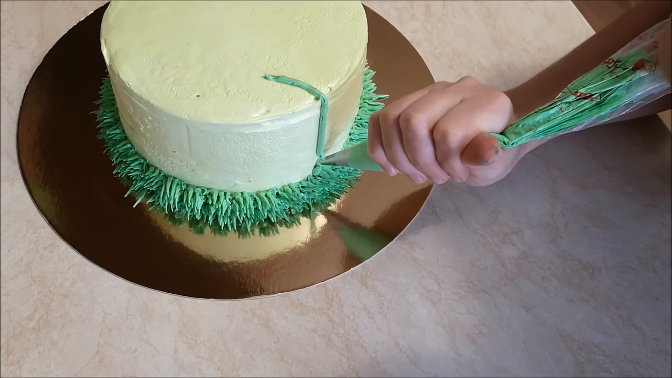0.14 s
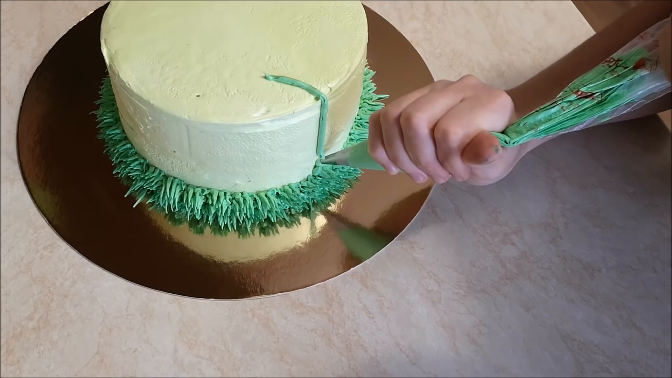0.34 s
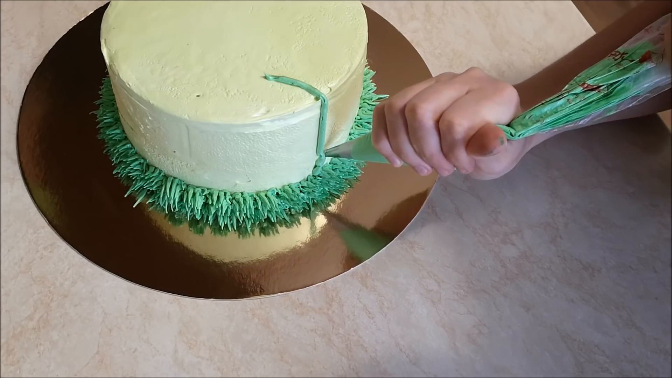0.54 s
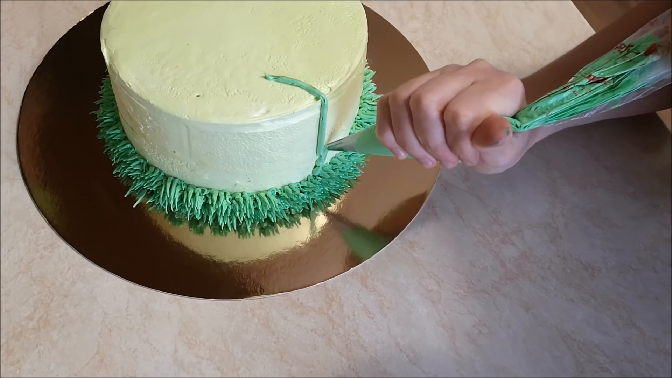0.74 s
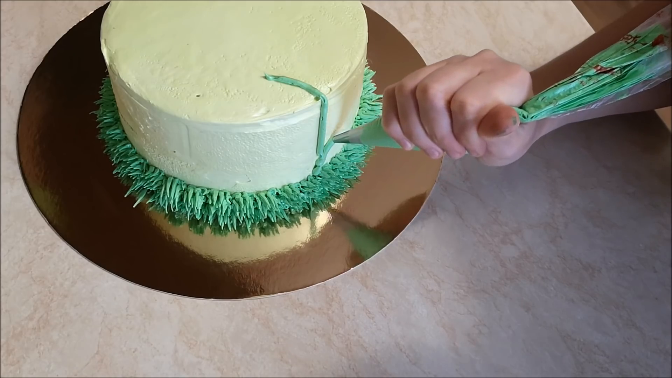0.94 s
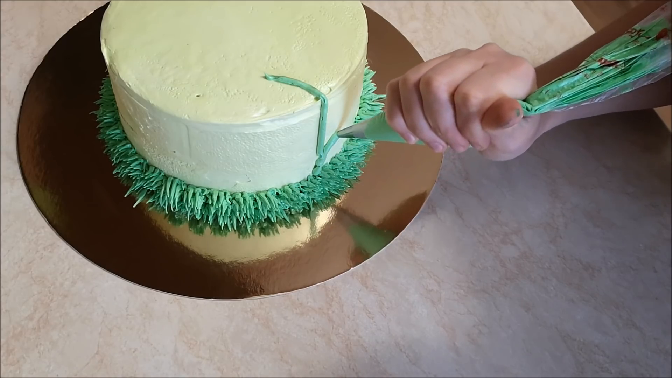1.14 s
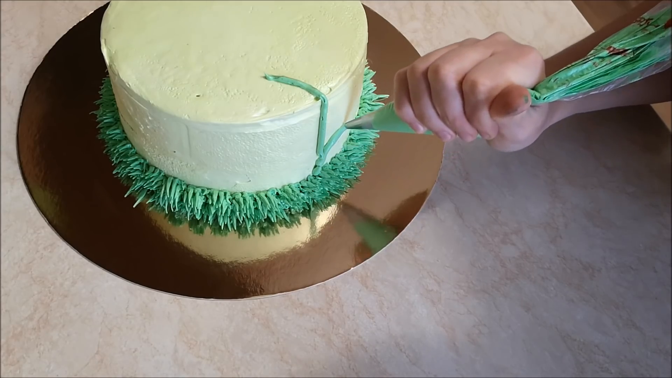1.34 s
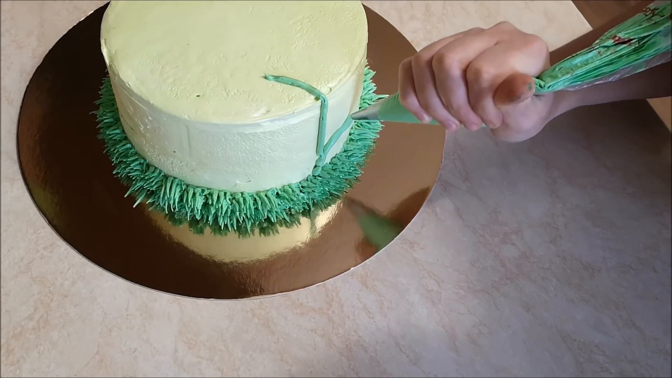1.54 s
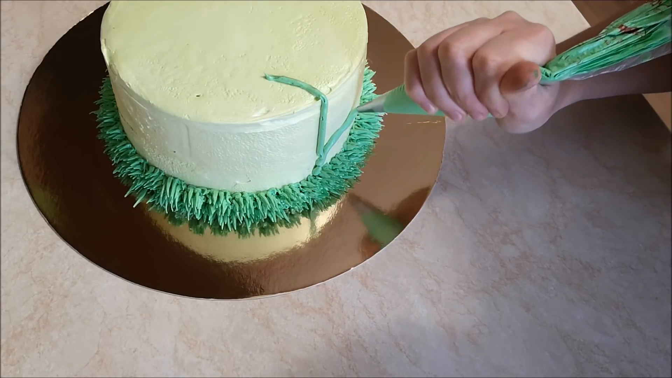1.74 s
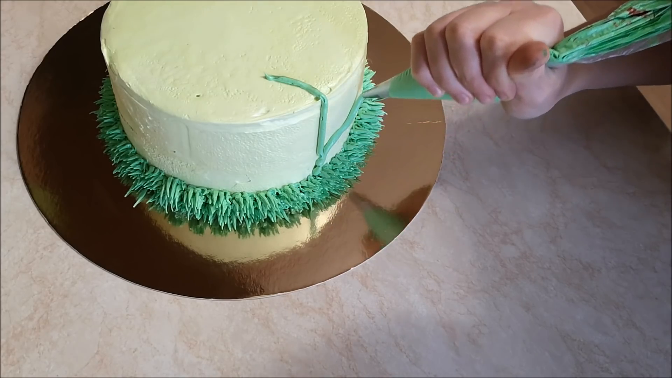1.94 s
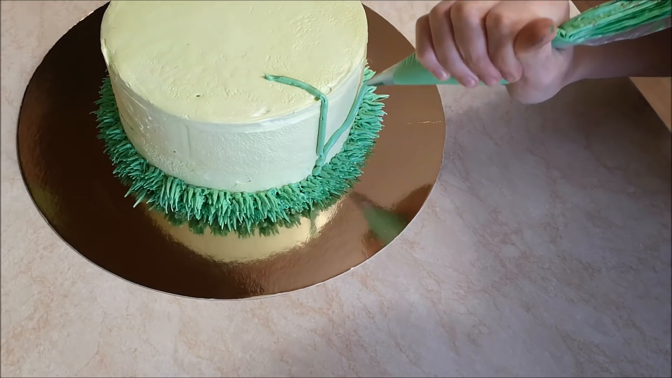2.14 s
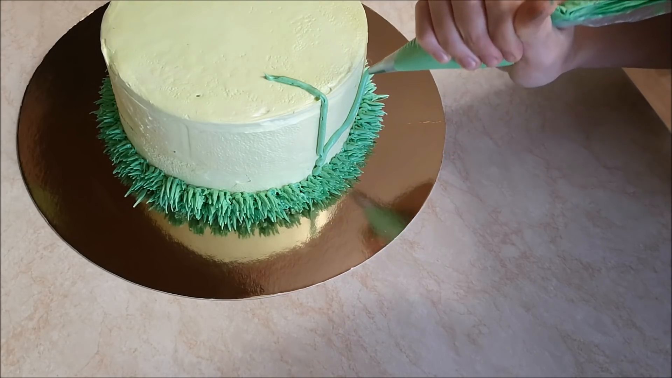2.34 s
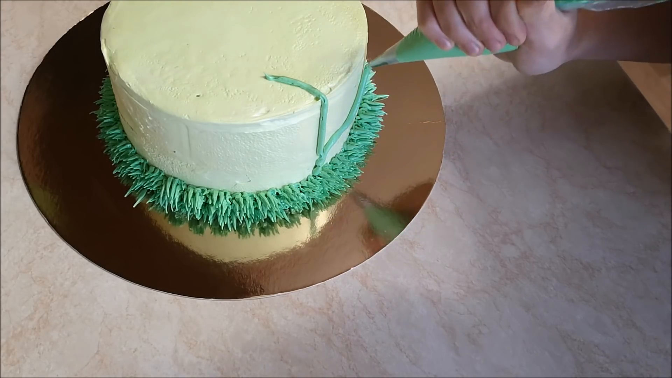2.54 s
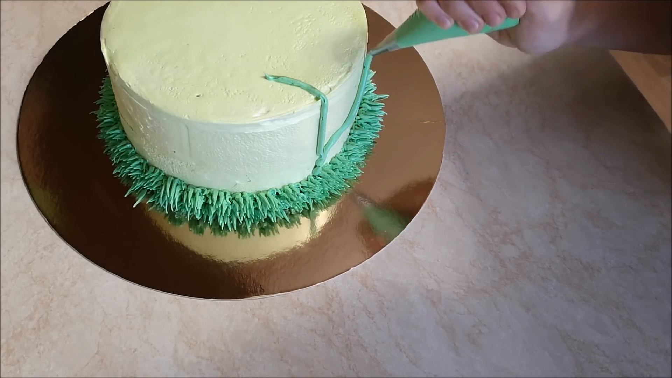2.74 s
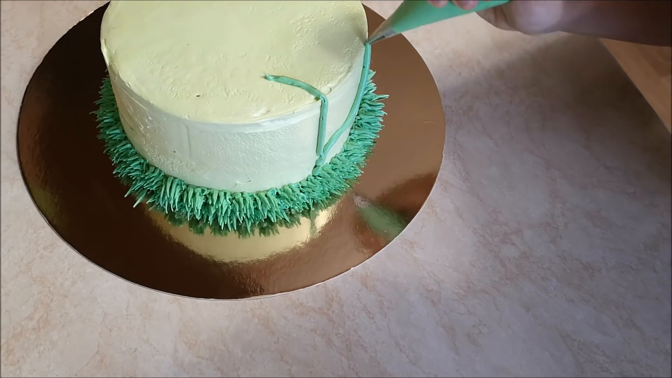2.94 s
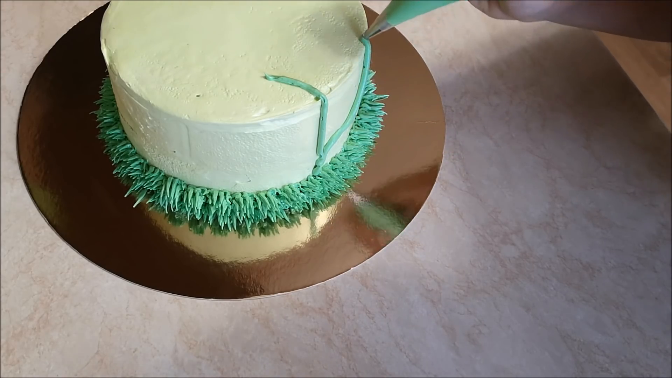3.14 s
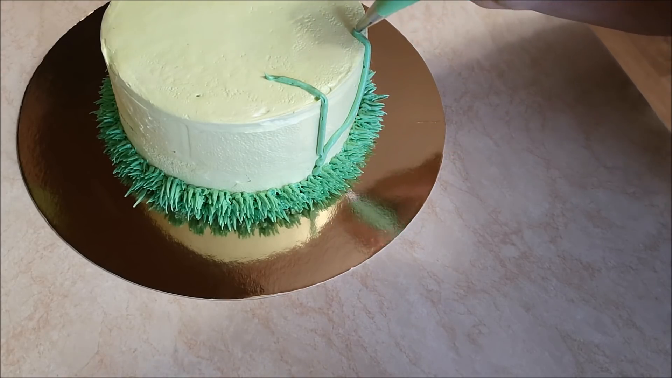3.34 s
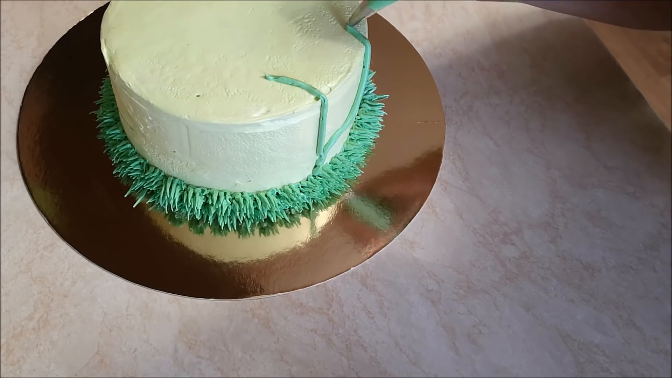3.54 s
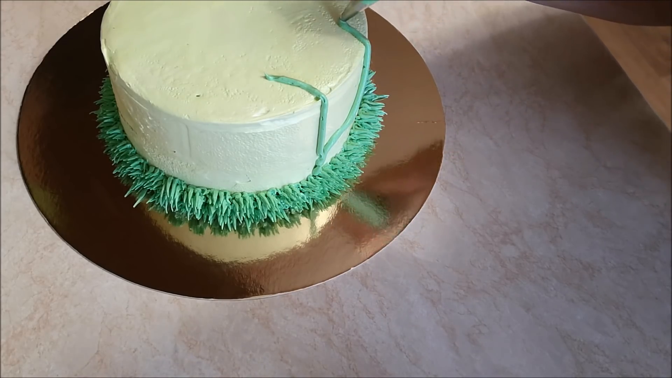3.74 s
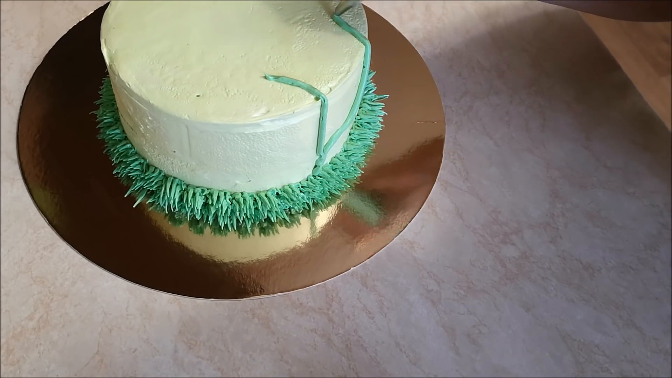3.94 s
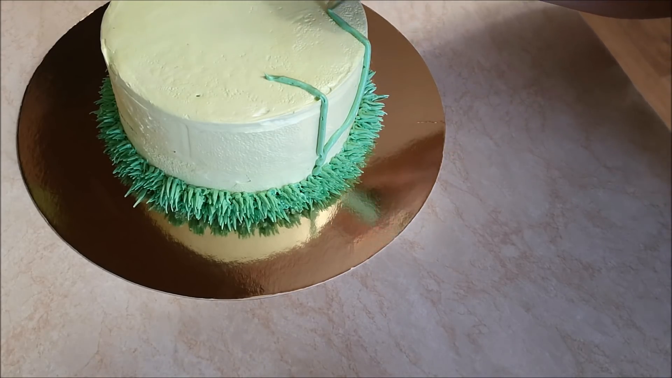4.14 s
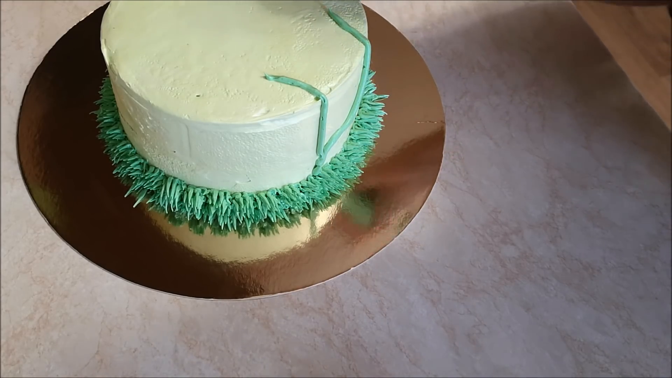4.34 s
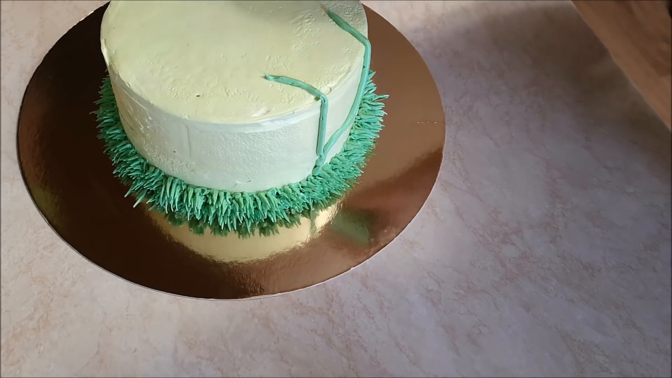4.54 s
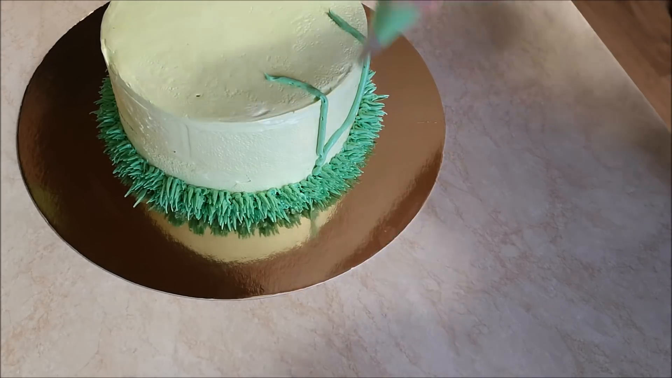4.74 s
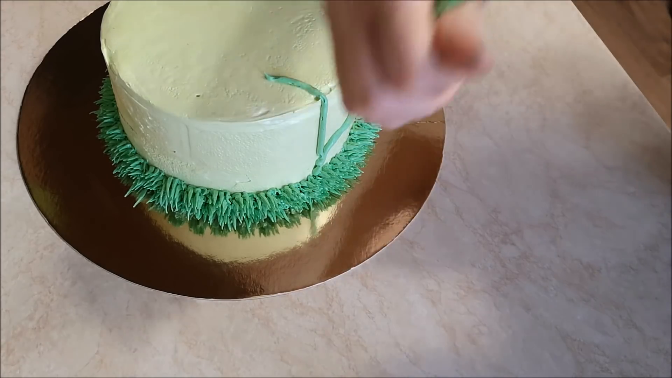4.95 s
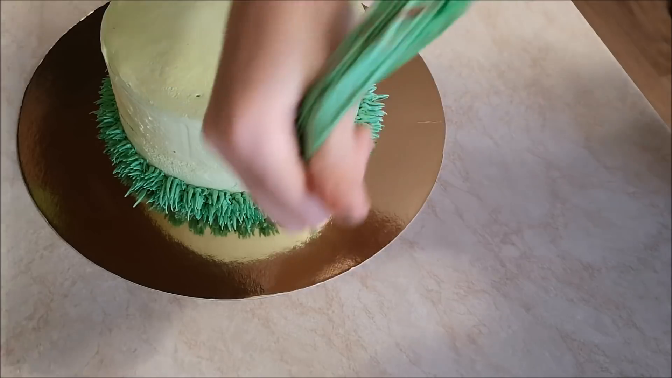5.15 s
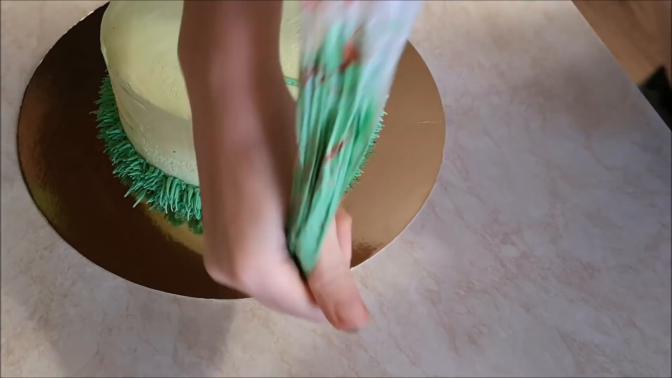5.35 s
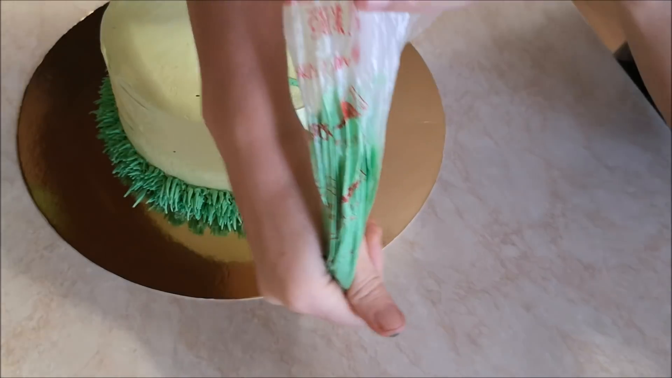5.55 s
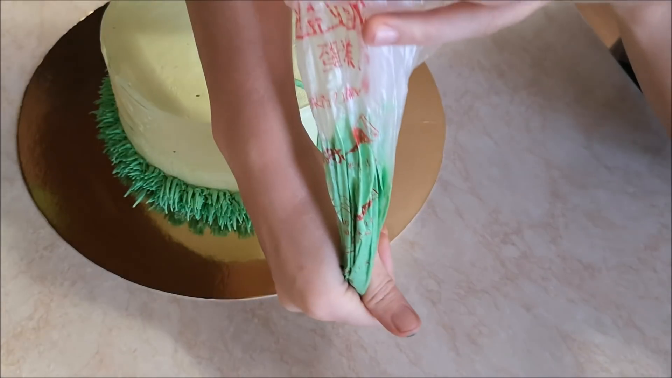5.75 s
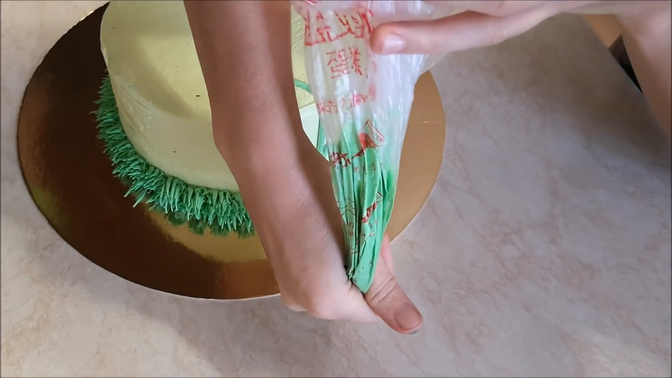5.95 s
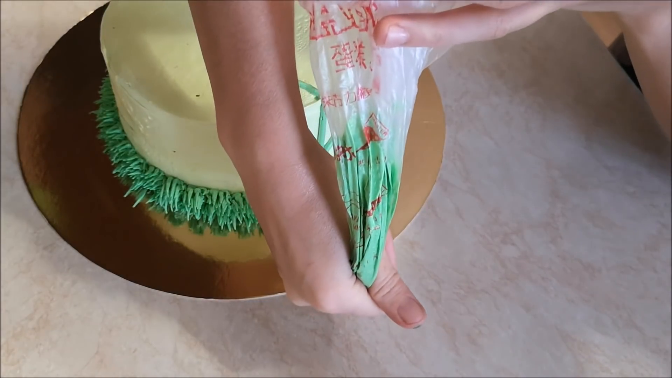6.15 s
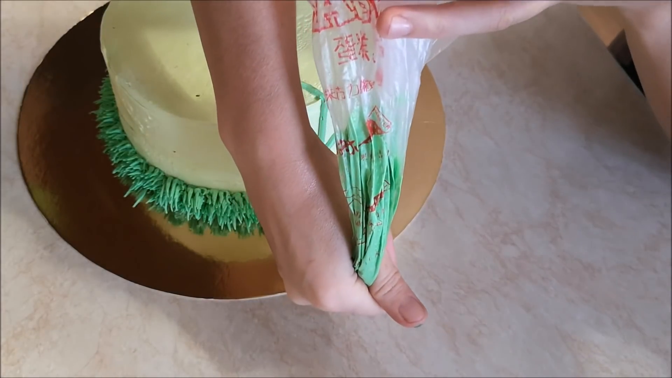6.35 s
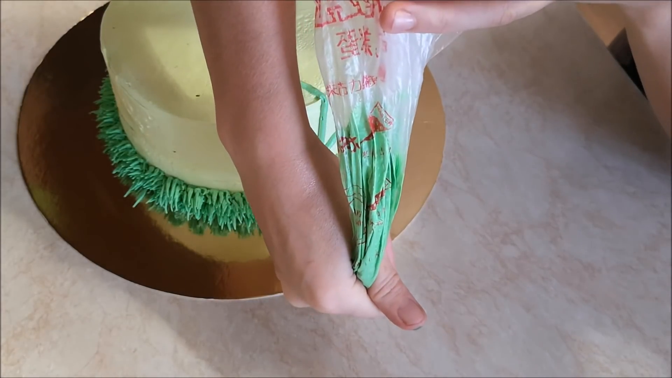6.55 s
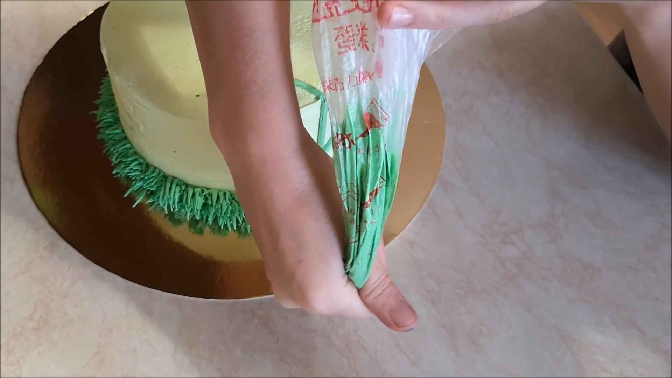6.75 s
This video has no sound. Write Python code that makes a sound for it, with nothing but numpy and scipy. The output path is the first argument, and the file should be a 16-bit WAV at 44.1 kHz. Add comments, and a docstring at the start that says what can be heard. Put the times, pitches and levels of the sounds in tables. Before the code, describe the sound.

A thin plastic piping bag is squeezed, giving scattered light ticks and faint whispers of sliding film. Past the middle it is lifted and crumpled, and the snaps crowd into a crisp, dense rustle, with a dull rumble of moving arms and a soft push of air. It settles back to a few ticks. The microphones are close, in a quiet kitchen where a refrigerator hums faintly.

```python
"""A thin plastic piping bag is squeezed, then lifted and crumpled close to a pair of microphones.
Its creases snap one by one, each a burst of noise ringing a facet of film, then crowd into a dense
rustle; the film whispers as it slides and relaxes. A quiet kitchen answers with a short tail.
Moving arms add a dull rumble and a soft push of air. Behind, a refrigerator hums and whirrs
over room air and hiss."""
import sys
import numpy as np
from scipy import signal
from scipy.fft import rfft, irfft, next_fast_len
from scipy.io import wavfile

SR = 44100
rng = np.random.default_rng(int(sys.argv[2]) if len(sys.argv) > 2 else 0)


def wav_record(signal):
    """Record a signal, one row per channel, as 16-bit PCM in the file named by sys.argv[1]."""
    frames = np.transpose(np.atleast_2d(signal))
    bounded = np.clip(frames, -1, 1)
    # unit amplitude maps onto the largest positive 16-bit level
    quanta = np.round(bounded * 32767).astype(np.int16)
    wavfile.write(sys.argv[1], SR, quanta)


N = 299259
TIME = np.arange(N) / SR


def from_db(db):
    """Decibels to gain."""
    return np.exp(np.asarray(db) * np.log(10) / 20)


def unit_rms(x):
    """Scale to an rms of 1."""
    return x / np.sqrt(np.mean(x ** 2) + 1e-20)


def automation(rows):
    """Breakpoints, time first, to one curve per remaining column."""
    times, *columns = np.transpose(rows)
    return [np.interp(TIME, times, column) for column in columns]


def at_hz(points, hz):
    """Read a curve on a log-frequency axis."""
    freqs, values = np.transpose(points)
    return np.interp(np.log(hz), np.log(freqs), values)


def drift(rate_hz):
    """Slow random modulation with a spread of 1."""
    hop, run_in = 40, 2000
    r = np.exp(-2 * np.pi * rate_hz * hop / SR)
    slow = signal.lfilter([1], [1, -2 * r, r * r], rng.standard_normal(N // hop + run_in + 2))[run_in:]
    return np.interp(np.arange(N) / hop, np.arange(len(slow)), unit_rms(slow))


def butter(x, hz, kind="low", order=2):
    """Butterworth filter."""
    return signal.sosfilt(signal.butter(order, hz, kind, fs=SR, output="sos"), x)


def resonate(x, hz, width_hz):
    """Two-pole resonance, unity gain at its peak."""
    r = np.exp(-np.pi * width_hz / SR)
    poles = [1, -2 * r * np.cos(2 * np.pi * hz / SR), r * r]
    return signal.lfilter(np.array([1, 0, -1]) * (1 - r * r) / 2, poles, x)


def ring(x, hz, width_hz):
    """Two passes through a resonance, at unit rms."""
    return unit_rms(resonate(resonate(x, hz, width_hz), hz, width_hz))


def eq(x, curve):
    """Shape the spectrum with an EQ curve."""
    size = next_fast_len(x.shape[-1], real=True)
    hz = np.maximum(np.fft.rfftfreq(size, 1 / SR), 1)
    return irfft(rfft(x, size) * from_db(at_hz(curve, hz)), size)[..., :x.shape[-1]]


def tilt(x, tilt_db, pivot_hz=4500):
    """Tip the treble against the lows; at 0 dB a mild bump stays at the pivot."""
    return from_db(-tilt_db / 2) * butter(x, pivot_hz) - from_db(tilt_db / 2) * butter(x, pivot_hz, "high")


def pan(left_db):
    """Stereo gains that favour the left by left_db."""
    return from_db([[left_db / 2], [-left_db / 2]])


def stereo(mid, side, correlation):
    """Mix two noises into left and right with a given correlation."""
    correlation = np.clip(correlation, -.999, .999)
    mid, side = np.sqrt(1 + correlation) * mid, np.sqrt(1 - correlation) * side
    return np.array([mid + side, mid - side])


def stereo_noise(correlation):
    """White noise in two channels."""
    return stereo(*rng.standard_normal((2, N)), correlation)


def noise_bands(noise, bands, waver_db):
    """Narrow bands of noise, each slowly swelling and sinking."""
    return sum(from_db(level_db + waver_db * drift(1.6)) * ring(noise, hz, width_hz)
               for hz, width_hz, level_db in bands)


# Tone of the room air and microphone hiss: f/Hz, level/dB
AIR_EQ = [(11, -56), (20, -16), (45, -20.5), (72, -24), (88, -7), (125, -9), (190, -10.5), (225, -18.5),
          (330, -15), (520, -26.5), (700, -27.5), (1600, -31.5), (3900, -36.5), (9000, -44), (16000, -47)]
# Stereo image of the air: f/Hz, left-right correlation
AIR_IMAGE = [(60, 0.99), (130, 1), (290, 0.56), (640, -0.61), (1400, 0.092), (15000, -0.24)]


def room_air(level_db=-64.5):
    """A steady bed of air and hiss, centred in the bass and wide above it."""
    size = next_fast_len(N, real=True)
    hz = np.maximum(np.fft.rfftfreq(size, 1 / SR), 1)
    mid, side = rfft(rng.standard_normal((2, size))) * from_db(at_hz(AIR_EQ, hz))
    bed = irfft(stereo(mid, side, at_hz(AIR_IMAGE, hz)), size)[:, :N]
    return from_db(level_db + .5 * drift(0.98)) * unit_rms(bed)


# Tone of the refrigerator's whirr: f/Hz, level/dB
WHIRR_EQ = [(200, -33), (400, -10), (650, -11), (1600, 2.5), (2800, 6), (4100, -31), (4650, -5.5),
            (5600, -6), (9300, -20), (12000, -44)]
# Faint whistles riding on it: f/Hz, width/Hz, level/dB
WHIRR_WHISTLES = [(639, 8.4, -82.5), (952, 32, -84.5), (1578, 7.3, -88), (3180, 130, -92),
                  (3380, 17, -90.5), (4600, 280, -90.5), (4600, 28, -90), (9000, 250, -92.5)]


def fridge_whirr(level_db=-79.5, lag_samples=26):
    """Broad whirr and thin whistles come from one side, reaching the right microphone later."""
    broad = from_db(level_db + 1.1 * drift(1.7)) * unit_rms(eq(rng.standard_normal(N), WHIRR_EQ))
    whirr = broad + noise_bands(rng.standard_normal(N), WHIRR_WHISTLES, waver_db=1.5)
    return np.array([whirr, np.roll(whirr, lag_samples)])


# Level ride of the magnetic hum: t/s, level/dB
HUM_RIDE = [(0, -58), (2, -58), (4, -58.5), (5.1, -58.5), (5.3, -51.5), (5.6, -56.5), (5.95, -59),
            (6.2, -57.5), (6.79, -61)]
# Compressor shaft tones: harmonic number, level/dB, waver/dB, left phase lead/rad
SHAFT_TONES = [(1, -69.5, 1.5, 0.061), (3, -66, 2.5, 0.066), (4, -72, 3.5, 0.08), (5, -81.5, 1.5, 0.84),
               (6, -79.5, 2.5, 2.24), (8, -92, -1, 3.1), (9, -82, 4.5, 3.16), (11, -82, -5, 3.04)]
# Ride of the low end: t/s, shaft fundamental trim/dB, rumble level/dB
LOW_END_RIDE = [(0, 3.5, -70.5), (2.5, -0.5, -67), (3.4, 3.5, -64.5), (3.8, -1, -78.5), (5.2, -13, -65.5),
                (6.0, -5, -86), (6.79, -20, -72)]
# Low noise drones: f/Hz, width/Hz, level/dB
LOW_DRONES = [(60.4, 9.8, -75), (185.45, 10, -70), (242.5, 7.1, -74), (256.5, 8.4, -73.5)]


def fridge_hum(hum_hz=100.0, shaft_hz=49.3):
    """Magnetic hum at twice the mains, a shaft slipping just below mains speed, rumble and drones."""
    hum_db = automation(HUM_RIDE)[0] + 1.77 * drift(2.4)
    hum = from_db(hum_db) * np.sin(2 * np.pi * hum_hz * TIME)
    tones = np.array([hum, hum])
    trim_db, rumble_db = automation(LOW_END_RIDE)
    shaft_angle = 2 * np.pi * np.cumsum(shaft_hz + 0.14 * drift(1.33)) / SR
    for harmonic, level_db, waver_db, lead in SHAFT_TONES:
        gain = from_db(level_db + (trim_db if harmonic == 1 else 0) + waver_db * drift(2.6))
        phase = harmonic * shaft_angle + rng.uniform(0, 2 * np.pi)
        tones += gain * np.sin([phase + lead, phase])
    rumble = from_db(rumble_db) * unit_rms(resonate(stereo_noise(0.96), hz=40, width_hz=22))
    drones = noise_bands(stereo_noise(1.0), LOW_DRONES, waver_db=1.0)
    return np.sqrt(2) * tones + rumble + drones


# Soft pushes of air on the microphones: t/s, peak level/dB, f/Hz, t60/s
AIR_PUSHES = [(5.32, -45, 22, .16)]


def arm_movement(rest_db=-73, moving_db=-59):
    """A dull rumble swells while the arms move; pushed air gives a short sub-bass thump."""
    ride_db = np.interp(TIME, [4.5, 4.8, 5.8, 6.0], [rest_db, moving_db, moving_db, rest_db])
    out = from_db(ride_db) * unit_rms(butter(stereo_noise(0.7), [84.6, 216], "band"))
    for start, peak_db, hz, t60 in AIR_PUSHES:
        age = np.maximum(TIME - start, 0)
        out += from_db(peak_db - 60 * age / t60) * np.sin(2 * np.pi * hz * age)
    return out


def kitchen_reverb(mono, t60=0.32, treble_t60=0.069, wall_cut_hz=11500):
    """Wall reflections as a dense tail, its own on each side, the treble dying first."""
    t = np.arange(SR // 2) / SR
    noise = rng.standard_normal((2, len(t)))
    dull = butter(noise, wall_cut_hz, order=1)
    tail = dull * from_db(-60 * t / t60) + (noise - dull) * from_db(-60 * t / treble_t60)
    tail *= np.clip((t - .003) / 0.0019, 0, 1)  # pre-delay to the nearest walls
    tail /= np.sqrt(np.sum(tail ** 2) / 2)
    return signal.fftconvolve(np.tile(mono, (2, 1)), tail, axes=1)[:, :N]


# Tone of small creases in the film: f/Hz, level/dB
FILM_EQ = [(300, -13), (600, -18), (950, -5.5), (2100, 1), (3300, -4.5), (5500, -6.5), (8000, -7.5),
           (11000, -11), (14600, -16.5), (16000, -60)]
BAG_CORRELATION, BAG_LEFT_DB = 0.13, 4  # the bag sounds wide and sits left of centre


def film_tone(noise):
    """Give noise the colour of thin plastic, at unit rms."""
    return unit_rms(eq(noise, FILM_EQ))


def decaying_power(times, levels_db, t60):
    """A power envelope that jumps at each cue and dies away."""
    hits = np.zeros(N)
    hits[(times * SR).astype(int)] = from_db(levels_db) ** 2
    return signal.lfilter([1], [1, -from_db(-120 / (t60 * SR))], hits + 1e-18)


# Soft slides of film on skin: t/s, level/dB
SKIN_SLIDES = [(0.23, -69.5), (0.63, -73), (0.93, -86), (1.21, -74), (2.2, -73), (3.01, -67.5), (3.36, -65),
               (3.43, -60.5), (5.96, -78)]


def film_whisper(slide_rise_s=0.015, relax_db=-27.5, long_snap_ms=4.3):
    """Smooth hiss as the film slides on skin and relaxes after each snap, less after a short one."""
    times, snap_db, *_, length_ms = np.transpose(CREASE_SNAPS)
    after_db = snap_db + relax_db + 20 * np.log10(np.minimum(length_ms / long_snap_ms, 1))
    relaxing = decaying_power(times, after_db, t60=0.43)
    pole = np.exp(-1 / (slide_rise_s * SR))
    sliding = decaying_power(*np.transpose(SKIN_SLIDES), t60=0.28)
    sliding = signal.lfilter([1 - pole], [1, -pole], sliding)
    hiss = tilt(film_tone(stereo_noise(BAG_CORRELATION)), 0)
    return np.sqrt(sliding + relaxing) * pan(BAG_LEFT_DB) * hiss


# How hard the bag is worked: t/s, level/dB, treble tilt/dB
RUSTLE_RIDE = [(0, -91, -17), (2.9, -80.5, -1), (4.25, -79.5, 2), (4.58, -73.5, 9), (4.7, -66, -6),
               (4.84, -50.5, 4), (4.9, -61.5, 2), (5.0, -49.5, 0), (5.07, -56, 5), (5.19, -43, -2),
               (5.245, -38, -6.5), (5.29, -46, 15), (5.4, -53.5, -3), (5.6, -53.5, -7), (5.65, -52, -3),
               (5.7, -48, -1), (5.75, -78, 3), (5.83, -59.5, -17), (5.89, -88, -5), (6.79, -85, -4)]


def bag_rustle(base_creases_per_s=330, decay_ms=3.7):
    """Many tiny creases give way in random clumps, each a short puff of noise."""
    level_db, tilt_db = automation(RUSTLE_RIDE)
    sizes = from_db(1.85 * np.minimum(rng.exponential(1, N), 4))
    triggers = rng.random(N) < base_creases_per_s * from_db(3.0 * drift(25)) / SR
    pole = np.exp(-1000 / SR / decay_ms)
    puffs = signal.lfilter([1], [1, -pole], sizes * triggers + 1e-18)
    crackle = film_tone(puffs * stereo_noise(BAG_CORRELATION))
    return from_db(level_db) * pan(BAG_LEFT_DB) * tilt(crackle, tilt_db)


# Cue list of snapping creases: t/s, level/dB, facet f/Hz, noise share/dB, treble tilt/dB, length/ms
CREASE_SNAPS = [(0.077, -66.5, 3280, -3, -11, 5.4), (0.201, -45.5, 4900, -3.5, 8, 1.7),
                (0.617, -53, 1050, -3, -12, 2.1), (0.618, -58, 2800, -8, 0, 1.7),
                (0.6188, -47.5, 7340, -2, -10, 2.1), (0.929, -65, 2380, -1, -1, 3.3),
                (1.2058, -66, 1980, 0, -22, 9.4), (1.9098, -54.5, 7900, -0.5, 9, 4),
                (1.9398, -61, 5600, 0, 6, 2.5), (2.2036, -57.5, 1430, -8, -12, 3.5),
                (2.2661, -67, 7850, 0, 15, 5.5), (2.3394, -59, 7960, -0.5, 29, 4.3),
                (2.4723, -61.5, 2000, 0, 1, 4.8), (2.6083, -32, 7400, -5.5, 7, 1),
                (2.7098, -57, 5560, -1.5, 6, 2.1), (2.88, -60, 5160, -2, 13, 3),
                (2.9511, -60, 2360, 0, 1, 5.5), (3.005, -50, 7400, -2.5, 9, 6.4),
                (3.0513, -51.5, 2200, 0, -9, 5.4), (3.1613, -44.5, 1420, -5.5, -39, 2.45),
                (3.211, -64.5, 1980, -7, -15, 7.5), (3.332, -64, 2830, 0, -4, 5.1),
                (3.373, -65.5, 3500, -20, -1, 52), (3.376, -70, 2700, -17, -5, 40),
                (3.412, -58, 6200, -3, 0, 4.3), (3.425, -32.5, 8200, -4.5, 14, 3.25),
                (3.7202, -51.5, 4500, -3, 5, 4.5), (3.9619, -52, 7750, 0, 3, 4.2),
                (4.1137, -51.5, 4600, -3.5, -7, 3.7), (4.2163, -49, 2700, -0.5, -7, 3.1),
                (4.3996, -60, 5660, -4, 6, 1.9), (4.4881, -54, 4760, 0, 10, 2.6),
                (4.4934, -50, 3740, -9, -4, 5.3), (4.524, -48.5, 1410, -0.5, 2, 1.7),
                (4.585, -63, 8000, 0, 4, 3), (4.6123, -34, 7400, 0, 22, 5.8),
                (4.6343, -35, 3730, 0, 5.5, 3.5), (4.6568, -48.5, 3070, -1.5, 3, 9),
                (4.7222, -49, 2880, -23, -1, 2.1), (4.7715, -49, 4670, -1, -1, 3.9),
                (4.7895, -49.5, 2810, -1.5, -1, 5.8), (4.8093, -44, 2280, -0.5, -5, 8.6),
                (4.8222, -41.5, 6730, -1, -12, 3.6), (4.8535, -44, 6730, 0, 13, 5),
                (4.8784, -53, 2460, -5, 10, 5.9), (4.9363, -42, 3970, 0, -3, 6.3),
                (4.958, -36, 9200, -0.5, 17, 4.6), (5.003, -30.5, 6730, 0, 12, 3.9),
                (5.0158, -35.5, 4640, 0, -20, 5.2), (5.0916, -39, 7900, 0, 0, 6.7),
                (5.1029, -37, 2350, 0, -11, 5.7), (5.1388, -44, 5600, 0, 7, 6.3),
                (5.1625, -33.5, 6800, -2.5, 3, 3), (5.168, -42.5, 8000, 0, 19, 8.2),
                (5.1853, -32, 8100, 0, 9, 1.8), (5.198, -31, 6800, 0, 4, 2.5),
                (5.2174, -30.5, 1590, -1, 22, 5.4), (5.228, -26, 11800, -5, -17, 4.5),
                (5.2369, -32.5, 9100, -2, -1, 25), (5.245, -35, 5600, -11, 2, 5.9),
                (5.2565, -31.5, 2330, 0, -36, 5.7), (5.264, -34.5, 2290, 3, -28, 2.9),
                (5.2802, -37, 6900, -3, -15, 4.1), (5.3124, -33, 7500, -1.5, -1.5, 12),
                (5.3208, -26, 7400, 0, 4, 3.3), (5.3414, -35, 2240, -10, 5, 9.1),
                (5.355, -42, 2070, -16, 14, 6.1), (5.3652, -28, 7650, 0, 8, 5.2),
                (5.402, -41, 7400, -15, 0, 2.8), (5.4237, -27, 7400, 0, 10.5, 5.4),
                (5.44, -34, 8000, -1, 4, 3.4), (5.453, -19.5, 2600, -7, 11, 1.24),
                (5.479, -28.5, 5800, -2.5, -3, 4.4), (5.484, -29, 6500, -0.5, 1, 6.5),
                (5.499, -39, 2340, 0, -1, 11), (5.5204, -38, 2380, -12, -8, 1.4),
                (5.5271, -30, 2800, -5, -12, 3), (5.5582, -35, 5550, -2, -14, 3.4),
                (5.5797, -33.5, 5250, -0.5, 2, 5.1), (5.607, -35, 6730, 0, 4, 4.9),
                (5.6185, -39.5, 6600, -2, -5, 10.4), (5.631, -37, 8000, 0, 7, 4.5),
                (5.666, -31, 7600, -5.5, 5, 6.7), (5.6797, -43, 6700, -4, 1, 3.6),
                (5.695, -39, 2360, -8, -15, 2.8), (5.7095, -33.5, 6800, -0.5, 20, 4.2),
                (5.7648, -41, 9000, -1.5, -14, 7.1), (5.7884, -35.5, 2230, -6, 21, 1.6),
                (5.8111, -41.5, 2450, -6, 17, 3), (5.83, -51, 2440, -6, 6, 4.2),
                (5.888, -64, 6700, -3, -11, 1.8), (5.9252, -43, 2760, -3.5, -20, 6),
                (5.9737, -66, 2830, 1, 14, 6.4), (6.1747, -59, 2430, -9, -7, 2.9),
                (6.194, -43, 4770, -4.5, -25, 1.4), (6.289, -60, 1390, 0, -18, 3.1),
                (6.3476, -44, 7100, 0, 4.5, 1.76), (6.4248, -45, 6840, 0, 10, 3.5),
                (6.5525, -60, 3800, -10, -10, 9.8), (6.57, -65.5, 3420, -5, -18, 14)]


def crease_snaps(facet_q=3.2, trim_db=-0.5, pan_spread_db=4):
    """Each crease runs through the film as a brief noisy burst and rings the facet beside it."""
    size = 2048
    ms = np.arange(size) * 1000 / SR
    out = np.zeros((2, N + size))
    noises = rng.standard_normal((len(CREASE_SNAPS), 2, size))
    pans_db = BAG_LEFT_DB + pan_spread_db * rng.standard_normal(len(CREASE_SNAPS))
    for cue, noise, left_db in zip(CREASE_SNAPS, noises, pans_db):
        start, level_db, hz, share_db, tilt_db, length_ms = cue
        attack = np.minimum(ms / (0.26 + 0.22 * length_ms), 1)
        burst = attack * np.exp(-(ms / max(length_ms, .5)) ** 3)
        settling = 0.66 * np.exp(-ms / 9.1)  # the film around the crease rustles on briefly
        white = stereo(*noise, BAG_CORRELATION)
        low_cut_hz = 1100 * 2 ** (-0.6 * (level_db + 50.5) / 10)  # small creases carry no lows
        thin = butter(white, np.clip(low_cut_hz, 200, 3000), "high")
        crack = unit_rms((burst + settling) * tilt(film_tone(thin), tilt_db))
        width_hz = hz / facet_q * from_db(0.24 * min(share_db, 0))  # a taut facet: less hiss, purer ring
        facet = ring(burst * white, hz, width_hz)
        share = min(from_db(share_db), 1)
        snap = np.sqrt(np.mean(burst ** 2)) * (share * crack + np.sqrt(1 - share ** 2) * facet)
        at = round(start * SR)
        out[:, at:at + size] += from_db(level_db + trim_db) * snap * pan(left_db)
    return out[:, :N]


def piping_bag(lift_s=4.55, far_top_hz=12000):
    """Snaps, rustle and whisper; the bag is further off and duller until it is lifted."""
    bag = crease_snaps() + bag_rustle() + film_whisper()
    return np.where(TIME < lift_s, butter(bag, far_top_hz), bag)


# How the microphone pair hears the bag: f/Hz, left minus right/dB
MIC_IMAGE = [(60, 16), (1300, -5), (2400, -1), (8000, 2.5), (11000, -3), (15000, -12)]


def close_mics(bag):
    """Each microphone colours the direct sound, pulling some bands left and others right."""
    left = eq(bag[0], [(hz, db / 2) for hz, db in MIC_IMAGE])
    right = eq(bag[1], [(hz, -db / 2) for hz, db in MIC_IMAGE])
    return np.array([left, right])


def scene():
    """The bag up front with its room tail, over arm movement, refrigerator and air."""
    bag = piping_bag()
    room = from_db(-7.5) * kitchen_reverb(bag.mean(axis=0))
    return close_mics(bag) + room + arm_movement() + fridge_hum() + fridge_whirr() + room_air()


def record(dry):
    """A steep high cut, 70 dB down from 17 kHz."""
    return signal.sosfilt(signal.cheby2(12, 70, 17000, fs=SR, output="sos"), dry)


dry = scene()
out = record(dry)
wav_record(out)
```